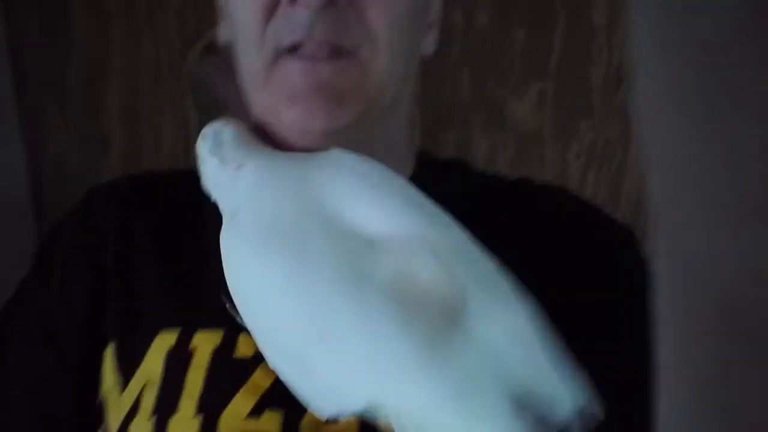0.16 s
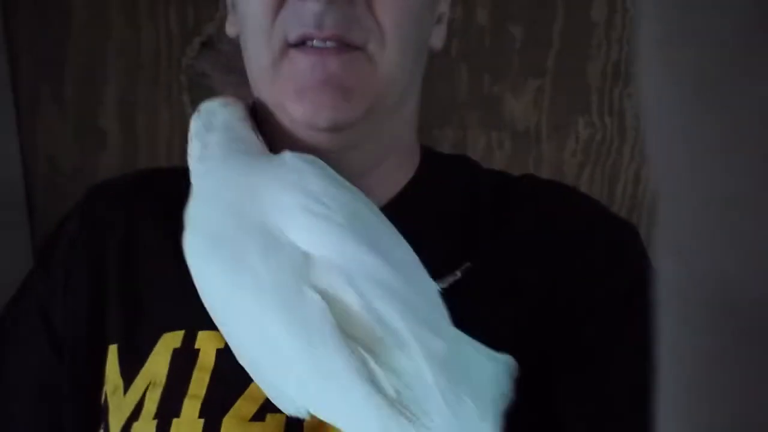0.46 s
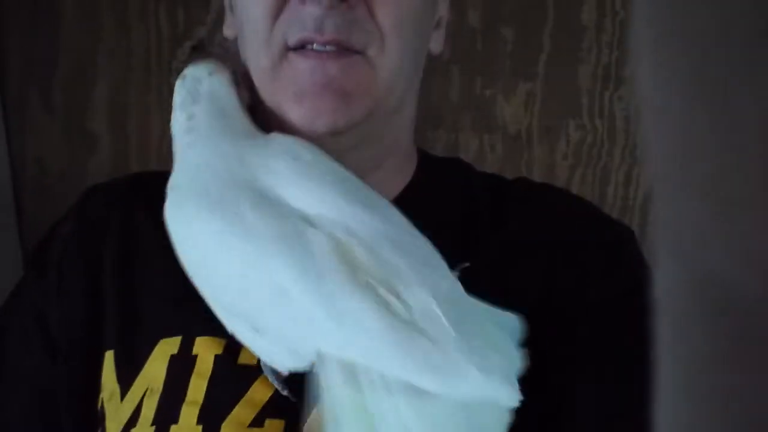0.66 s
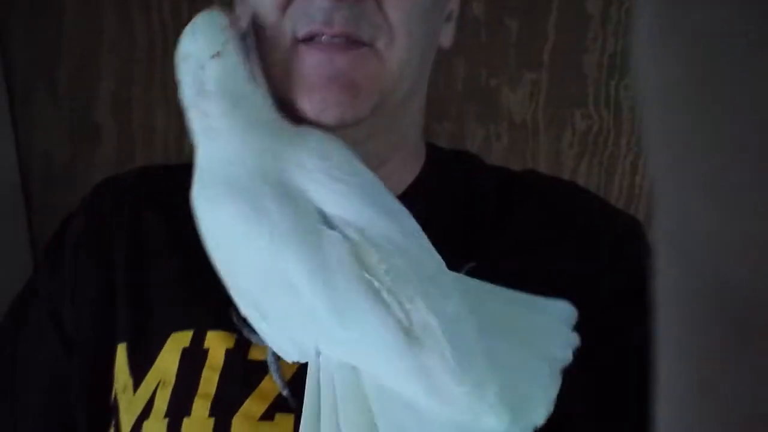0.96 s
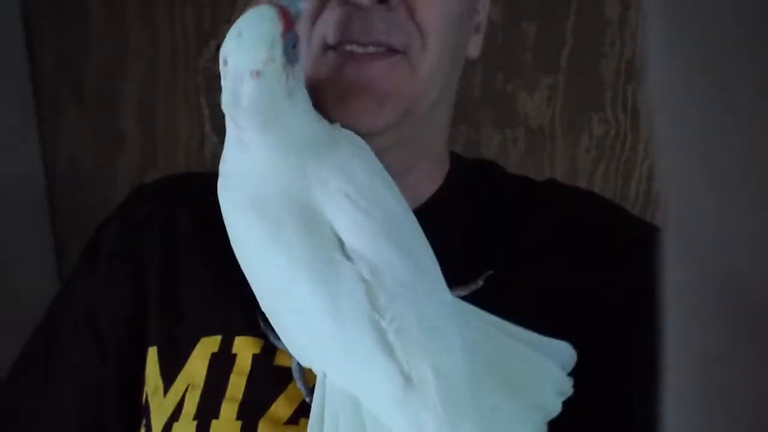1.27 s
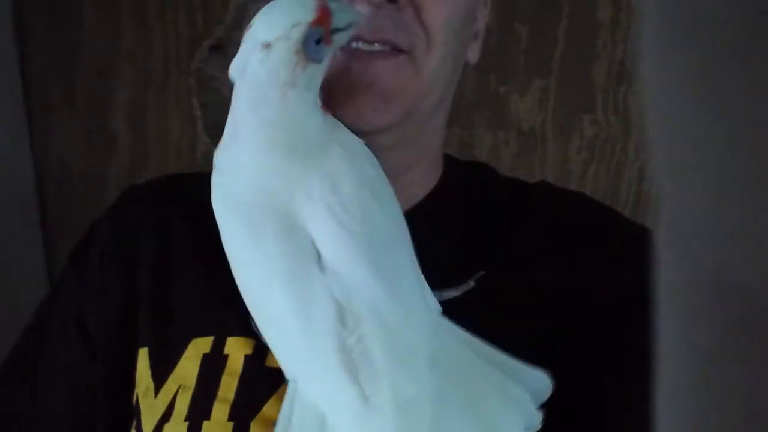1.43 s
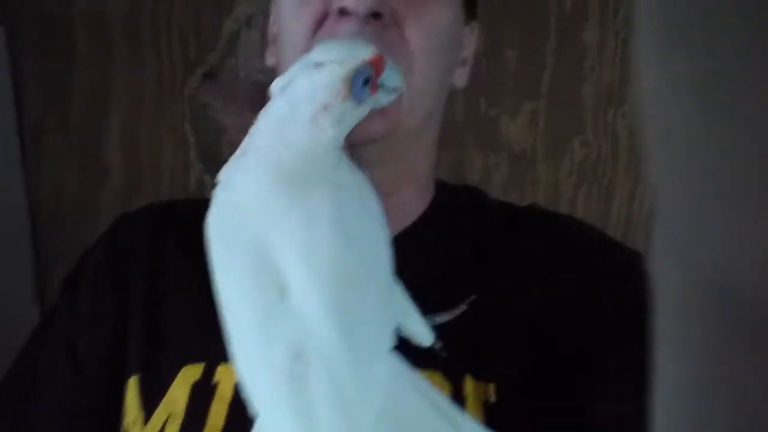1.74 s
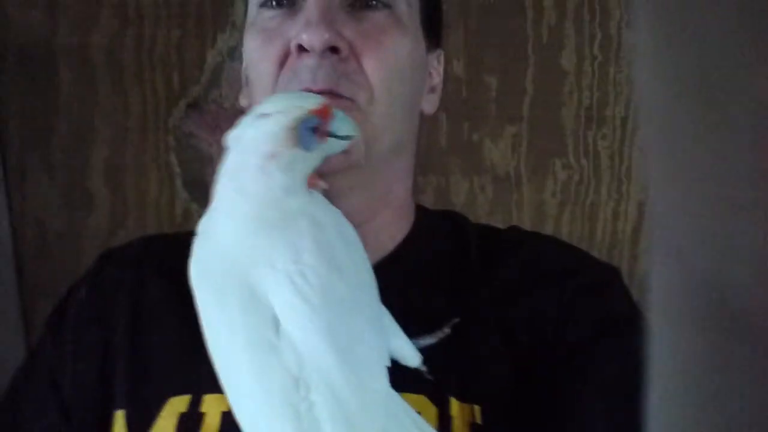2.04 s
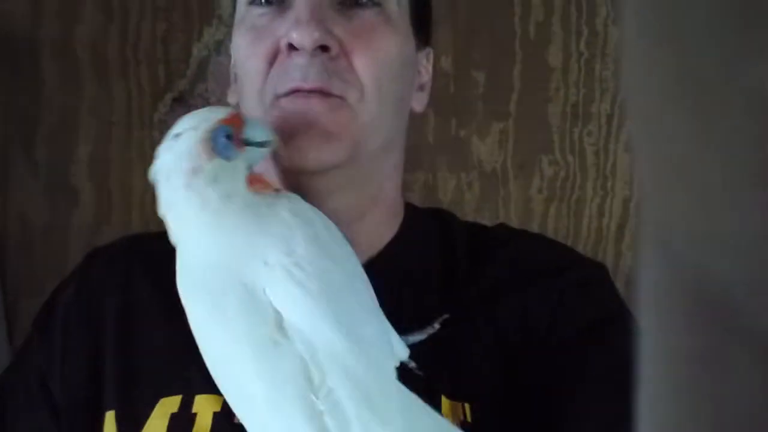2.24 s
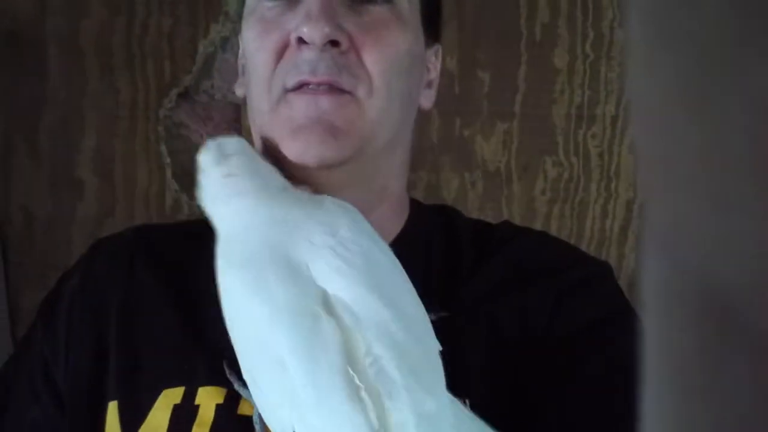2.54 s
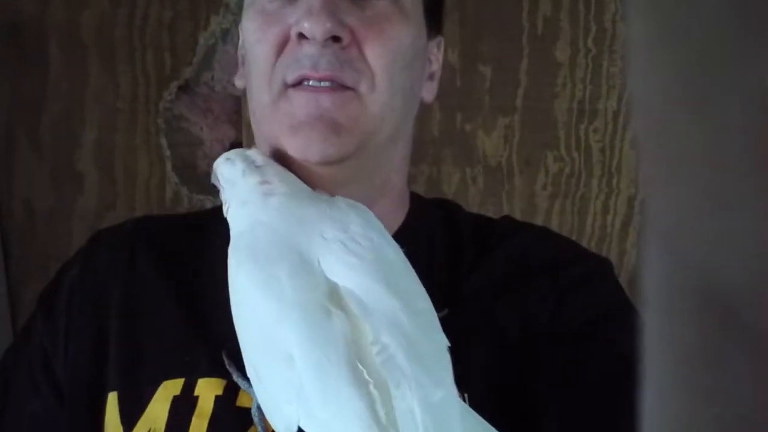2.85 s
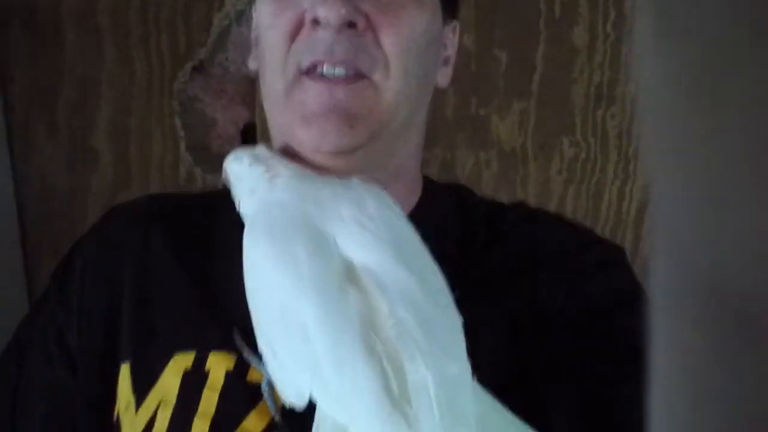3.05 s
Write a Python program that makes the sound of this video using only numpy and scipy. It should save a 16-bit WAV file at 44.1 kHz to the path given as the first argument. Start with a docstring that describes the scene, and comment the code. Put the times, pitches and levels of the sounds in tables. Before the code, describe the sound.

A cockatoo screams close to the microphone in a small, reverberant room with faint hum. A previous call's tail fades, then a harsh, raspy screech runs from 0.1 to 0.7 seconds, a soft bump beneath it. Low squawks and three squeak-edged yelps follow until 1.2, swelling rough until 1.6. A thin whistle and quiet wavering note lead to another screech at 2.0-2.6, then faint feather rustle at 2.7 and fading room ring.

```python
"""A cockatoo close to a stereo microphone in a small, live room, over mains hum and room noise. The tail of one
call dies away; a long screech follows, a chaotic tone buried in rasp, with a soft bump beneath. It breaks into
a lower squawk and three yelps, the first two opened by falling squeaks, and swells rough again. It thins to a
whistle and a clear wavering note of a few overtones, which leads into a second long screech. As that ends, a
faint band of noise gives the brush of feathers."""
import sys
import numpy as np
from scipy import signal
from scipy.fft import rfft, irfft, next_fast_len
from scipy.io import wavfile
from scipy.ndimage import uniform_filter1d, minimum_filter1d, map_coordinates

SR = 44100
rng = np.random.default_rng(int(sys.argv[2]) if len(sys.argv) > 2 else 0)


def generate_wav(sig):
    """Save sig (samples, or channels by samples) to the path in sys.argv[1] as 16-bit PCM at SR."""
    pcm = np.round(np.clip(np.atleast_2d(sig).T, -1, 1) * 32767).astype(np.int16)
    wavfile.write(sys.argv[1], SR, pcm)


N = 141120
LEAD = SR // 2  # samples run in beforehand, so the room is already ringing
T = np.arange(-LEAD, N) / SR  # seconds
TOP_HZ = 15600  # band limit

# All levels are relative: sources are balanced against each other before the microphone.
# effort of the screech [time_s, level_db]
SCREECH_EFFORT = [(-.3, -7), (-.06, -19), (-.02, -44), (.09, -28.5), (.135, -12), (.2, -12.5),
                  (.645, -12.5), (.69, -15), (.82, -53), (1, -24), (1.14, -14), (1.52, -12.5), (1.65, -22),
                  (1.78, -25.5), (1.84, -61), (1.96, -50), (1.99, -15.5), (2.09, -12), (2.5, -13),
                  (2.59, -20), (2.66, -25), (2.85, -55)]
# pitch of the screech [time_s, pitch_hz]
SCREECH_PITCH = [(.12, 1277), (.4, 1339), (.65, 1300), (1.15, 1299), (1.6, 1308), (2.05, 1279),
                 (2.62, 1280)]
# harmonic strengths of the screech [frequency_hz, level_db]
SCREECH_HARMONICS = [(1270, -5.5), (2500, 8.5), (3750, -16.5), (5000, 3), (6300, 3), (7600, -7),
                     (12000, -44)]
# spectrum of the breathy rasp [frequency_hz, density_db]
RASP_SPECTRUM = [(300, -33), (550, -20.5), (880, -23), (1120, -15.5), (1330, -2.5), (1520, -10), (1800, 0),
                 (1960, -6), (2350, 2), (2700, -5), (3000, -9), (3620, -1), (4400, -8), (6400, -2),
                 (7300, -16), (10000, -25.5), (15000, -41)]
# rough low squawks [start_s, length_s, mid_pitch_hz, level_db, pitch_scatter (fraction)]
SQUAWK_CALLS = [(0.667, .13, 869.3, -14.5, 0.11), (0.851, 0.13, 870, -19.5, .045),
                (1.477, 0.095, 567.7, -20.5, .035), (1.598, 0.082, 600, -21, 0.034)]
# harmonic strengths of a squawk [frequency_hz, level_db]
SQUAWK_HARMONICS = [(590, -4), (850, -14), (1200, 7), (1750, -1.5), (2600, 7), (3800, 3.5), (4800, -5),
                    (6200, 0), (8000, -25.5), (14000, -44)]
# yelps [start_s, length_s, settled_pitch_hz, level_db before push and sag]
YELP_CALLS = [(0.833, 0.13, 915.7, -14.5), (1.021, 0.15, 917.6, -13), (1.209, 0.023, 886, -17)]
# harmonic strengths of a yelp [frequency_hz, level_db]
YELP_HARMONICS = [(920, -19), (1840, 3.5), (2750, 0), (3680, 2.5), (4600, -10.5), (5500, 1.5), (6400, -9),
                  (7350, -5.5), (8300, -36), (9200, -16.5), (14000, -55)]
# falling squeaks that open a yelp [start_s, length_s, starting_pitch_hz, level_db]
SQUEAK_CALLS = [(0.816, .013, 2843, -6), (1.007, .013, 2850, -6.5)]
# harmonic strengths of a squeak [frequency_hz, level_db]
SQUEAK_HARMONICS = [(2800, 6.5), (5600, 2), (8400, -22.5), (14000, -31)]
# course of the clear note [time_s, pitch_hz, level_db, overtones_db, buzz_db]
NOTE_COURSE = [(1.73, 656.4, -45, -8, 8), (1.765, 681, -33.5, -2, -1.5), (1.829, 674.5, -33, 8, 0),
               (1.86, 659.7, -35, 13.5, 1), (1.91, 649.2, -31.5, 12, -18), (1.959, 646.2, -29, 12, -16),
               (2.005, 648, -34.5, 13, -16), (2.03, 671, -38, -7, -14), (2.12, 673, -54, -10, -14)]
# overtone strengths of the clear note [frequency_hz, level_db]
NOTE_OVERTONES = [(1300, -1.5), (1950, 1.5), (2600, -10), (3250, -30), (5200, -20), (8000, -31.5),
                  (14000, -51)]
# strengths of its high buzz [frequency_hz, level_db]
BUZZ_HARMONICS = [(4000, -6), (4700, 2), (5400, -8), (6000, -5), (6650, 1.5), (7400, -15), (14000, -34)]
# course of the whistle [time_s, pitch_hz, level_db]
WHISTLE_COURSE = [(1.594, 4520, -42), (1.639, 4510, -13.5), (1.675, 4470, -18.5), (1.715, 4500, -42),
                  (1.755, 4450, -28), (1.78, 4520, -49)]
# spectrum of the brushing feathers [frequency_hz, density_db]
FEATHER_SPECTRUM = [(800, -17), (2200, -8), (3500, 4), (5000, -9), (6700, -1), (9000, -16), (15000, -26)]
# decay time of the room [frequency_hz, t60_s]
ROOM_DECAY = [(200, 0.29), (1500, 0.68), (4000, 0.55), (7000, 0.42), (15000, 0.38)]
# balance of left and right [frequency_hz, left_minus_right_db]
CHANNEL_BALANCE = [(60, 0.3), (1300, 1), (1800, -5), (2700, -4.5), (4200, -6), (5400, -12), (6500, -20.5),
                   (7500, -6.5), (9500, -4), (15000, 11)]
# spectrum of the room noise [frequency_hz, density_db]
FLOOR_SPECTRUM = [(22, -26), (45, -3), (70, -12), (88, -2), (130, -4.5), (230, -3), (600, -9.5),
                  (1500, -15.5), (2500, -16.5), (4500, -23.5), (6500, -14.5), (8000, -32), (15000, -44)]
# spread of the room noise between left and right [frequency_hz, side_db]
FLOOR_SPREAD = [(100, -9), (500, -10.5), (1500, -1)]
# mains hum [frequency_hz, level_db]
HUM_TONES = [(59, -51), (120, -51)]
# spectrum of the soft bump [frequency_hz, density_db]
BUMP_SPECTRUM = [(40, -10), (130, 1.5), (260, -7.5), (600, -22), (1500, -44)]

TONE_DB, CORE_DB, RASP_DB, THROAT_DB = -9, -12, -1.5, -10  # mix of the screech
THROAT_HZ, THROAT_WIDTH_HZ = 2554, 200  # the main resonance
DULL_HZ, BRIGHT_PER_DB, FULL_DB = 4000, 1.9, -13  # treble loses more dB per dB below full voice
SQUAWK_RISE_PER_S = .6  # relative rise in pitch
YELP_PUSH_DB, YELP_SAG_DB_PER_S = 13.5, 29
SCOOP, SCOOP_S = .056, .0123  # relative extra pitch at a yelp's start, and its time constant
ATTACK_S, RELEASE_S = .0051, .011
RUSTLE_S, RUSTLE_LENGTH_S, RUSTLE_DB = 2.72, .087, -38
WET_DB, DIRECT_DB = -1, -6
FLOOR_DB = -43
BUMP_S, BUMP_DB, BUMP_T60_S = .475, -32.5, .93
CEILING, LIMITER_S = .95, .003


def amp(db):
    """Decibels to gain."""
    return 10 ** (np.asarray(db) / 20)


def unit(x):
    """Scale to rms 1."""
    return x / np.sqrt(np.mean(x ** 2) + 1e-20)


def along(points, hz):
    """Read (frequency, value) points on a log frequency axis."""
    f, v = np.transpose(points)
    return np.interp(np.log(hz + 1), np.log(f + 1), v)


def curves(rows):
    """One value per sample for each column after the time."""
    s, *cols = np.transpose(rows)
    return [np.interp(T, s, c) for c in cols]


def wobble(rate):
    """A smooth random curve, rate knots a second."""
    knots = rng.standard_normal(len(T) // 8)
    return map_coordinates(knots, [np.arange(len(T)) * rate / SR], mode="wrap")


def filtered(x, gain):
    """Apply a gain over frequency, leaving phase alone."""
    m = next_fast_len(len(T) + SR // 4)
    return irfft(rfft(x, m) * gain(np.fft.rfftfreq(m, 1 / SR)), m)[..., :x.shape[-1]]


def noise(spectrum):
    """Coloured noise of rms 1."""
    return unit(filtered(rng.standard_normal(len(T)), lambda hz: amp(along(spectrum, hz))))


def gate(start, length):
    """Linear attack, hold and exponential release."""
    attack = np.clip((T - start) / ATTACK_S, 0, 1)
    return attack * np.exp(-np.maximum(T - start - length, 0) / RELEASE_S)


def sine(hz):
    """A sine of rms 1 along a pitch curve."""
    return unit(np.sin(2 * np.pi * np.cumsum(hz) / SR))


def syrinx(hz, tone, jitter, jitter_rate, shimmer_db, order=1):
    """Harmonics from the given order up, on a pitch and strength that tremble at random."""
    phase = 2 * np.pi * np.cumsum(hz * (1 + jitter * wobble(jitter_rate))) / SR
    centre = np.median(hz)
    wave = 0
    for k in range(order, int(TOP_HZ / centre) + 1):
        strength = amp(along(tone, k * centre))
        wave = wave + strength * np.sin(k * phase + rng.uniform(0, 2 * np.pi))
    return unit(wave * amp(shimmer_db * wobble(jitter_rate)))


def screech():
    """A chaotic tone in fluttering rasp that rings the throat, duller when the bird eases off."""
    (effort_db,), (hz,) = curves(SCREECH_EFFORT), curves(SCREECH_PITCH)
    tone = syrinx(hz, SCREECH_HARMONICS, jitter=.04, jitter_rate=600, shimmer_db=4.5)
    rasp = unit(noise(RASP_SPECTRUM) * amp(3.2 * wobble(450)))
    # a steadier lowest partial
    core = np.sin(2 * np.pi * np.cumsum(hz * (1 + .0228 * wobble(300))) / SR)
    core = unit(core * amp(3.7 * wobble(60)))
    ring = unit(filtered(rasp, lambda f: 1 / (1 + ((f - THROAT_HZ) / THROAT_WIDTH_HZ) ** 2) ** 2))
    voice = amp(TONE_DB) * tone + amp(CORE_DB) * core
    voice = voice + amp(RASP_DB) * rasp + amp(THROAT_DB) * ring
    voice = voice * amp(effort_db + .69 * wobble(70))
    low = filtered(voice, lambda f: 1 / (1 + (f / DULL_HZ) ** 4))
    treble = voice - low
    return low + treble * amp(BRIGHT_PER_DB * np.minimum(effort_db - FULL_DB, 0))


def squawks():
    """The voice drops to a lower, very rough register, its pitch rising through each squawk."""
    out = 0
    for start, length, hz, db, rough in SQUAWK_CALLS:
        from_middle = np.clip(T - start - length / 2, -length, length)
        pitch = hz * (1 + SQUAWK_RISE_PER_S * from_middle)
        cry = syrinx(pitch, SQUAWK_HARMONICS, jitter=rough, jitter_rate=400, shimmer_db=3.5)
        out = out + amp(db) * gate(start, length) * cry
    return out


def yelps():
    """Hoarse pitched cries that settle from a sharp, loud start."""
    out = 0
    for start, length, hz, db in YELP_CALLS:
        age = np.maximum(T - start, 0)
        push = np.exp(-age / SCOOP_S)
        pitch = hz * (1 + SCOOP * push + .00792 * wobble(60))
        cry = syrinx(pitch, YELP_HARMONICS, jitter=.0176, jitter_rate=700, shimmer_db=5)
        level_db = db + YELP_PUSH_DB * push - YELP_SAG_DB_PER_S * age
        out = out + cry * gate(start, length) * amp(level_db)
    return out


def squeaks(fall=.045):
    """A brief high tone slides down just before a yelp, faster and faster."""
    out = 0
    for start, length, hz, db in SQUEAK_CALLS:
        pitch = hz * (1 - fall * np.clip((T - start) / length, 0, 1.7) ** 2)
        cry = syrinx(pitch, SQUEAK_HARMONICS, jitter=.016, jitter_rate=900, shimmer_db=2.5)
        out = out + amp(db) * gate(start, length) * cry
    return out


def whistle():
    """A thin, high, slightly unsteady sine as the first call runs out."""
    hz, db = curves(WHISTLE_COURSE)
    tone = sine(hz * (1 + .0076 * wobble(350)))
    start, end = WHISTLE_COURSE[0][0], WHISTLE_COURSE[-1][0]
    return tone * amp(db) * gate(start, end - start)


def clear_note():
    """A wavering note that starts thin and buzzy, then fills out with low overtones."""
    hz, db, over_db, buzz_db = curves(NOTE_COURSE)
    hz = hz * (1 + .012 * wobble(110))
    overtones = syrinx(hz, NOTE_OVERTONES, jitter=.0062, jitter_rate=500, shimmer_db=2, order=2)
    buzz = syrinx(hz, BUZZ_HARMONICS, jitter=.00646, jitter_rate=400, shimmer_db=-5, order=6)
    note = sine(hz) + amp(over_db) * overtones + amp(buzz_db) * buzz
    start, end = NOTE_COURSE[0][0], NOTE_COURSE[-1][0]
    return gate(start, end - start) * amp(db + 2.4 * wobble(70)) * note


def feathers():
    """Feathers brush as the bird turns: a faint, uneven rustle of coloured noise."""
    level_db = RUSTLE_DB + 4.5 * wobble(90)
    return noise(FEATHER_SPECTRUM) * gate(RUSTLE_S, RUSTLE_LENGTH_S) * amp(level_db)


def room(x):
    """A diffuse noise tail for each channel; each frequency dies at its own speed."""
    hz, t, z = signal.stft(rng.standard_normal((2, SR)), SR, nperseg=256)
    decay = amp(-60 * t / along(ROOM_DECAY, hz)[:, None])
    tail = signal.istft(z * decay, SR, nperseg=256)[1]
    return signal.fftconvolve(x[None], tail / np.linalg.norm(tail[0]), axes=1)[:, :len(T)]


def bump():
    """A soft, low bump as the bird shifts: dull noise dying away."""
    fade_db = -60 * np.maximum(T - BUMP_S, 0) / BUMP_T60_S
    return noise(BUMP_SPECTRUM) * gate(BUMP_S, BUMP_T60_S) * amp(BUMP_DB + fade_db)


def mains_hum():
    """Steady sines, the same in both channels."""
    return sum(amp(db) * unit(np.sin(2 * np.pi * hz * T)) for hz, db in HUM_TONES)


def room_noise():
    """Steady coloured noise, spread by a second noise of opposite sign left and right."""
    side = filtered(noise(FLOOR_SPECTRUM), lambda hz: amp(along(FLOOR_SPREAD, hz)))
    return amp(FLOOR_DB) * (noise(FLOOR_SPECTRUM) + np.array([side, -side]))


def left_right_colour(hz):
    """Gains of the left and right channels, of equal joint power at every frequency."""
    gains = amp(np.outer([.5, -.5], along(CHANNEL_BALANCE, hz)))
    return gains / np.sqrt(np.mean(gains ** 2, axis=0))


def scene():
    """The bird and its room, coloured differently left and right."""
    bird = screech() + squawks() + yelps() + squeaks() + whistle() + clear_note() + feathers()
    direct = np.array([np.roll(bird, SR // 4000), bird])  # reaches the left channel about 0.25 ms later
    both = amp(DIRECT_DB) * direct + amp(WET_DB) * room(bird)
    both = both + bump() + mains_hum() + room_noise()
    return filtered(both, left_right_colour)[:, LEAD:] * amp(2)


def record(dry):
    """A fast limiter holds the peaks; nothing is kept above the band limit."""
    size = int(LIMITER_S * SR) + 1
    needed = np.minimum(1, CEILING / (np.abs(dry) + 1e-9))
    held = minimum_filter1d(needed, size, axis=1)
    gain = uniform_filter1d(held, size, axis=1)
    return filtered(dry * gain, lambda hz: hz < TOP_HZ)


dry = scene()
out = record(dry)
generate_wav(out)
```